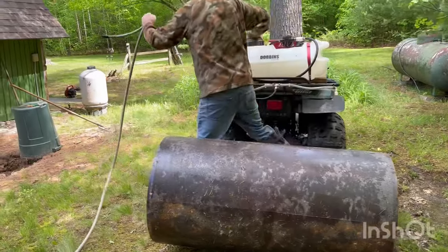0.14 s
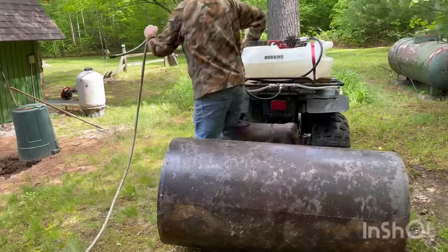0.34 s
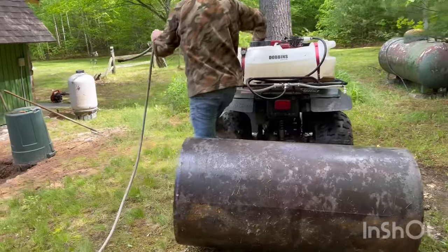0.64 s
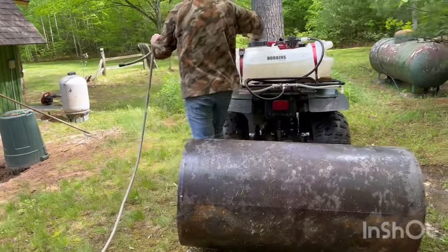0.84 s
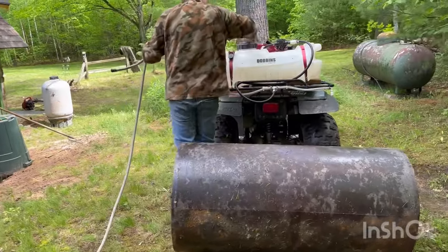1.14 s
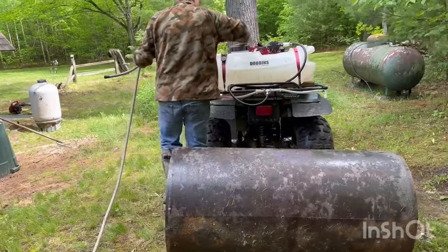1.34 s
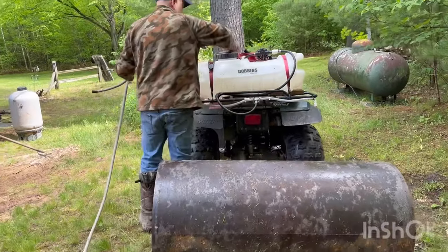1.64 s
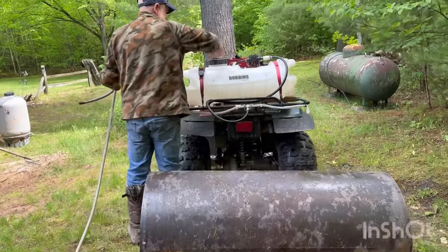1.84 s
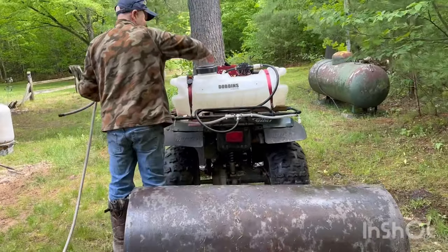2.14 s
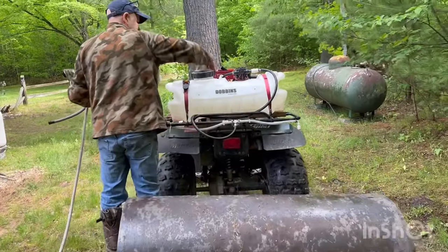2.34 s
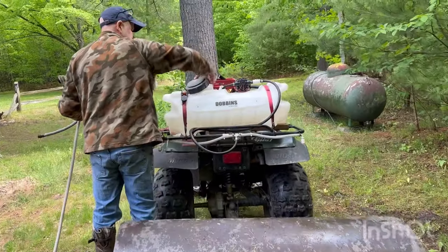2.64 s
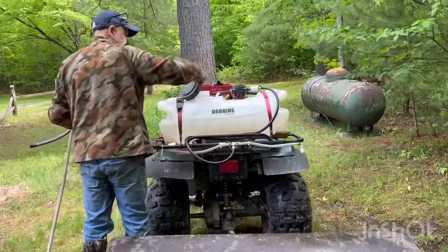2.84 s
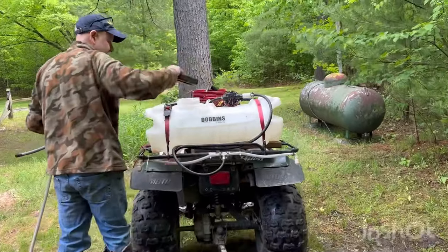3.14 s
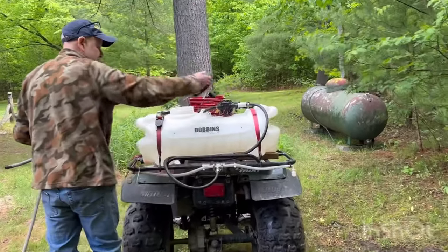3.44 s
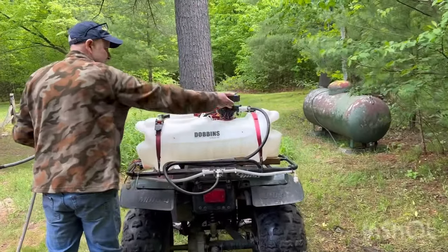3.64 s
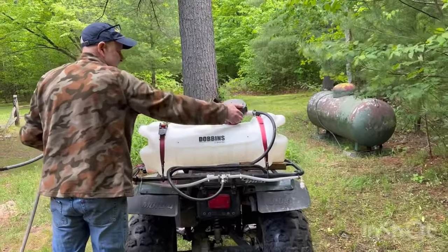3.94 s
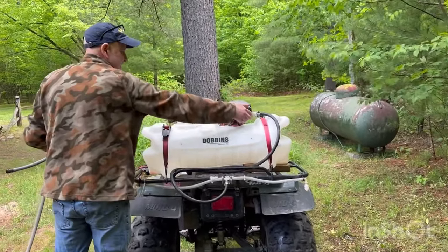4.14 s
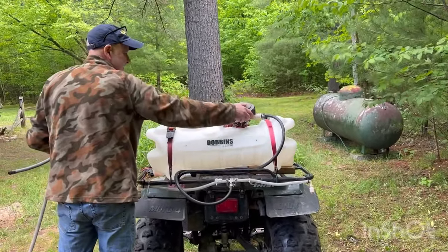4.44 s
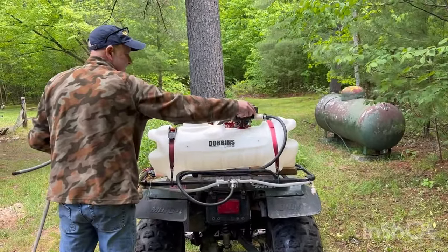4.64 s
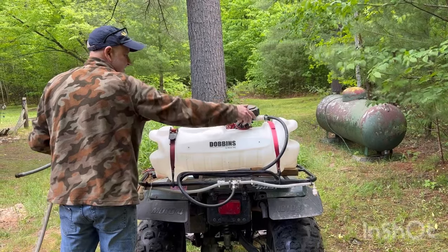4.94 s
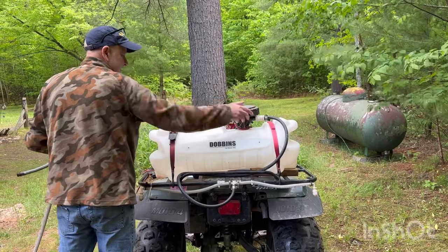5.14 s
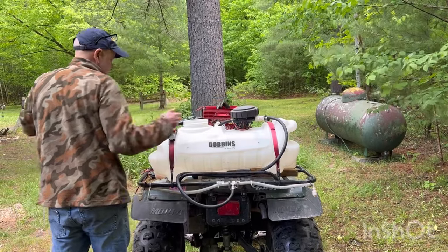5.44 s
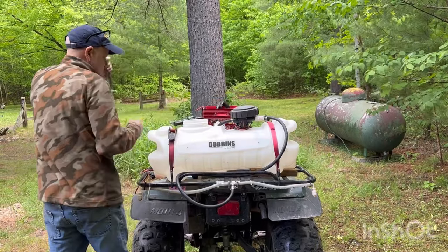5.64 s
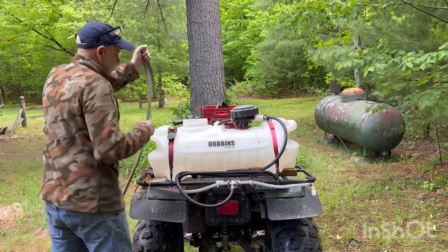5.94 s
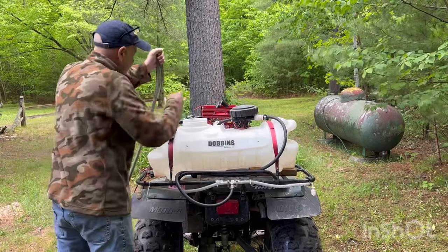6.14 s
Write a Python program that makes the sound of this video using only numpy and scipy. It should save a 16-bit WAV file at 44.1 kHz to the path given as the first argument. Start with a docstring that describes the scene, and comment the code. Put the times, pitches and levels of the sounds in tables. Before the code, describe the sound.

A quiet yard with a soft, wide hiss of leaves and faint low air rumble throughout. From 0.2 s a plastic screw lid is wrenched round on a large hollow tank: a dry, juddering scrape with a jolt and falling thump, then further short rasps near 0.6, 0.9, 1.2, 1.4 and 1.7 s, with knocks between. A stronger scrape comes at 2.0 s, another at 2.4 with a hard clunk at 2.45 and thin metallic chinks until 2.6. A last faint scrape falls around 2.8, while a distant bird gives a thin, quavering high whistle from 2.4 to 3.2. At 3.7 the lid clacks down and the tank air booms deeply. Light taps follow at 4.1 to 4.6, then a sharper clack and flexing thumps at 4.75. A jacket sleeve rustles faintly from 5.3 to 6.1. At 5.95 a hose end hits the tank, the loudest hollow knock, ringing briefly into the leaves.

```python
"""In a yard, the screw lid of a plastic sprayer tank is twisted off in jerky turns: stick-slip noise scrapes and judders.
Each turn has a jolt, mostly just after the scrape begins; jolts and knocks are damped wall modes and shaped noise.
The lid clacks down on the open tank, whose air booms at low modes; a metal part chinks; buckling walls thump.
A jacket sleeve rustles and a hose end knocks the tank with a short hollow note.
Leaves hiss all around as drifting stereo noise, and a far bird gives one thin, quavering whistle."""
import sys
import numpy as np
from scipy import signal
from scipy.fft import rfft, irfft, next_fast_len
from scipy.io import wavfile
from scipy.ndimage import map_coordinates

SR = 44100
rng = np.random.default_rng(int(sys.argv[2]) if len(sys.argv) > 2 else 0)


def master_out(mix):
    """Clip the mix to full scale and print it as 16-bit PCM to the path in sys.argv[1]."""
    frames = np.transpose(np.atleast_2d(mix))
    ceiling = np.clip(frames, -1, 1)
    pcm = np.round(ceiling * 32767).astype(np.int16)
    wavfile.write(sys.argv[1], SR, pcm)


N = 276948
TIME = np.arange(N) / SR  # s
AGE = np.arange(SR) / SR  # s since a hit

# wrist turns: (jolt time [s], push lead [s], push length after jolt [s], scrape level [dB],
#   hiss re scrape [dB], fizz re scrape [dB], jolt level [dB])
TURNS = [(0.213, 0.025, 0.28, -45, -5.5, -14.5, -30), (0.641, 0.011, 0.13, -44, -5.5, -11.5, -34),
         (0.922, 0.033, 0.042, -42.5, -10, -15.5, -35), (1.205, 0.026, 0.012, -43, -8.5, -15, -34),
         (1.434, 0.028, 0.037, -43.5, -10, -16.5, -33), (1.663, 0, 0.14, -49.5, -11.5, -14.5, -45),
         (1.999, 0.034, 0.26, -38.5, -12.5, -17, -37), (2.428, 0.027, 0.18, -42, -27, -21, -33),
         (2.873, 0.11, 0.034, -52, -12, -16, -36.5)]
# rumble spectrum of the tank wall: (frequency [Hz], density [dB])
WALL = [(25, -17), (50, -11.5), (82, 6.5), (150, -7.5), (280, -1.5), (450, -8.5), (700, -12.5),
        (1300, -50.5), (3000, -49.5)]
# rasp spectrum of neck and panels: (frequency [Hz], density [dB])
RASP = [(200, -16), (550, -7.5), (1050, 4.5), (1300, -1.5), (1600, 3), (2000, -13), (2400, -3.5),
        (3100, -16.5), (3800, -9.5), (6000, -43.5), (15000, -54)]
# hiss spectrum of dry plastic and swishing jacket: (frequency [Hz], density [dB])
HISS = [(800, -41), (2300, 10.5), (3100, 7), (3700, 11.5), (5300, 1), (8000, -23), (16000, -30)]
# crack spectrum of hard plastic: (frequency [Hz], density [dB])
CRACK = [(200, 7), (700, 7), (2000, 2.5), (3100, 0), (4000, 1.5), (5700, -10), (6700, -6), (9000, -13),
         (13000, -27), (16000, -39)]


def amp(db):
    """Decibels to gain."""
    return 10 ** (np.asarray(db) / 20)


def unit(x):
    """x at rms 1."""
    return x / np.sqrt(np.mean(x ** 2) + 1e-20)


def burst(x):
    """A hit with the energy of 20 ms at rms 1."""
    return x / np.sqrt(np.sum(x ** 2) / (SR * .02))


def along(points, hz):
    """Interpolate (frequency [Hz], value) points on a log frequency axis."""
    f, v = np.transpose(points)
    return np.interp(np.log(hz + 1), np.log(f + 1), v)


def curves(rows):
    """One value per sample for each column after the time."""
    s, *cols = np.transpose(rows)
    return [np.interp(TIME, s, c) for c in cols]


def wobble(rate_hz):
    """A smooth random curve, rate_hz knots a second."""
    knots = rng.standard_normal(int(N * rate_hz / SR) + 4)
    return map_coordinates(knots, [TIME * rate_hz])


def swells(rows):
    """Gain of smooth rises and falls, one per (middle [s], length [s], level [dB]) row."""
    return sum(amp(db) * np.cos(np.pi * np.clip((TIME - s) / length_s, -.5, .5))
               for s, length_s, db in rows)


def filtered(x, response):
    """x through a complex response of frequency."""
    size = x.shape[-1]
    m = next_fast_len(size + 8192)
    spectrum = rfft(x, m) * response(np.fft.rfftfreq(m, 1 / SR))
    return irfft(spectrum, m)[..., :size]


def coloured(x, spectrum, size=4096):
    """x through a causal minimum-phase filter, built by folding the cepstrum."""
    gain = amp(along(spectrum, np.fft.rfftfreq(size, 1 / SR)))
    cepstrum = irfft(np.log(gain))
    cepstrum[1:size // 2] *= 2
    cepstrum[size // 2 + 1:] = 0
    impulse = irfft(np.exp(rfft(cepstrum)))
    return signal.fftconvolve(x, impulse)[:len(x)]


def add(track, s, sound):
    """Mix a sound into the track at time s."""
    part = track[round(s * SR):][:len(sound)]
    part += sound[:len(part)]


def ring(modes, scatter_db, free=1):
    """Damped modes at random strengths and signs; free scales their ring times."""
    hz, db, t60_s = np.transpose(modes)[:, :, None]
    gain = amp(db + scatter_db * rng.standard_normal(hz.shape)) * rng.choice([-1, 1], hz.shape)
    decay = amp(-60 * AGE / (t60_s * free))
    return np.sum(gain * decay * np.sin(2 * np.pi * hz * AGE), axis=0)


def clatter(spectrum, t60_s):
    """Decaying coloured noise: countless close modes that die together."""
    noise = rng.standard_normal(SR) * amp(-60 * AGE / t60_s)
    return burst(coloured(noise, spectrum))


def slips(rate_hz, spread_db):
    """Tiny stick-slip jerks of uneven size at random moments, rate_hz a second on average."""
    size = amp(spread_db * np.minimum(rng.exponential(size=N), 3))
    return (rng.random(N) < rate_hz / SR) * size * rng.choice([-1, 1], N)


def push(start_s, end_s, rise_s, release_db_per_s):
    """Gain of one push of the wrist: it builds up, sags as the push tires, and is let go."""
    sag_db_per_s = 29.5
    age = np.maximum(TIME - start_s, 0)
    let_go = np.maximum(TIME - end_s, 0)
    build_up = 1 - np.exp(-(age / rise_s) ** 2)
    return build_up * amp(-sag_db_per_s * age - release_db_per_s * let_go)


def threads():
    """The lid judders in its threads: slips shake the wall and rasp in the neck, and the dry plastic hisses."""
    # fizz spectrum: (frequency [Hz], density [dB])
    fizz_spectrum = [(2500, -25.5), (5500, 14), (7500, 10), (13000, 2), (16000, 0)]
    grip_s, fizz_rise_s, release_db_per_s = 0.022, 0.017, 129
    wall_linger = 0.83  # the wall's rumble falls at this share of the release rate
    wall_db, rasp_db = 4, -4.5  # re scrape level
    wall_gain, rasp_gain, hiss_gain, fizz_gain = np.zeros((4, N))
    for s, lead_s, length_s, db, hiss_db, fizz_db, _ in TURNS:
        span = s - lead_s, s + length_s
        stroke = push(*span, grip_s, release_db_per_s)
        wall_gain += amp(db + wall_db) * push(*span, grip_s, wall_linger * release_db_per_s)
        rasp_gain += amp(db + rasp_db) * stroke
        hiss_gain += amp(db + hiss_db) * stroke
        fizz_gain += amp(db + fizz_db) * push(*span, fizz_rise_s, release_db_per_s)
    jerks = unit(slips(rate_hz=1100, spread_db=4))
    grit = unit(slips(rate_hz=6000, spread_db=3)) + .7 * jerks
    snags = amp(-9) * unit(slips(rate_hz=45, spread_db=1))  # sparse crackle
    rumble = wall_gain * unit(coloured(jerks, WALL))
    rasp = rasp_gain * unit(coloured(jerks + snags, RASP))
    hiss = hiss_gain * unit(coloured(grit + snags, HISS))
    fizz = fizz_gain * unit(coloured(grit, fizz_spectrum))
    grip = amp(1.8 * wobble(80) - .4)  # the dry thread catches and lets go
    return rumble + grip * (rasp + hiss + fizz)


def blow(hard_db, free):
    """A blow cracks on the plastic, raps its panels and thuds through the tank; a harder one is brighter."""
    # whole-tank modes: (frequency [Hz], level [dB], t60 [s])
    tank_modes = [(107.2, -19, 1), (151.5, -19, 0.43), (193, -1, 0.19), (224.4, -3, 0.43), (265.8, -6, 0.2),
                  (278.3, 0, 0.13), (320, -7.5, 0.21), (381, -6.5, 0.086), (439.6, -9, 0.62)]
    # wall-panel modes: (frequency [Hz], level [dB], t60 [s])
    panel_modes = [(526.6, -7, 0.37), (597, -2.5, 0.25), (724, -16, 0.15), (730, -12, 0.14), (840, -3, 0.2),
                   (958, -2.5, 0.22), (1048, -6.5, 0.36), (1170, -18, 0.082), (1552, 7, 0.06),
                   (1670, 14, 0.035), (2337, 16, 0.032)]
    contact_hz, contact_oct_per_db = 514, 0.24  # a harder contact reaches higher modes
    crack_db, crack_db_per_hard_db = -13, 1.28
    thud = amp(-2.0) * burst(ring(tank_modes, 1.0, free)) + amp(-5.5) * clatter(WALL, t60_s=0.18)
    panels = amp(-0.5) * burst(ring(panel_modes, 3, free)) + amp(-0.5) * clatter(RASP, t60_s=0.11)
    bright_hz = contact_hz * 2 ** (contact_oct_per_db * hard_db)
    contact = signal.butter(2, min(bright_hz, SR / 4), fs=SR)
    onset = 1 - np.exp(-AGE / 0.00029)
    rap = amp(-7.5) * burst(signal.lfilter(*contact, panels * onset))
    crack = amp(-8.0) * clatter(CRACK, t60_s=0.017) + amp(-12) * clatter(CRACK, t60_s=0.17)
    return thud + amp(hard_db) * rap + amp(crack_db + crack_db_per_hard_db * hard_db) * crack


def knocks():
    """Each turn has a jolt, and hand, lid and hose bump the tank; a hand on it shortens the ring."""
    # blows of hand, lid and hose: (time [s], level [dB], hardness [dB], share of free ring time [1])
    bumps = [(0.381, -40, 1.5, 1), (0.613, -35.5, -12, 0.71), (0.769, -41.5, 1.5, 0.62),
             (0.944, -35.5, 2, 0.55), (1.166, -45, -3.5, .5), (1.331, -44, -9, 0.22),
             (1.941, -40.5, -1.5, 0.39), (2.147, -34, 6, 0.54), (2.334, -36.5, -3.5, .7),
             (2.452, -25.5, -4, 0.49), (2.502, -30.5, 5.5, 0.78), (2.591, -37, 2, 1),
             (2.897, -48.5, 1.5, .35), (3.713, -35, 0, .6), (3.873, -38.5, -10, 0.34),
             (3.892, -37, -2.5, 0.74), (4.132, -49, -11, 1), (4.544, -41.5, 0.5, 1), (4.628, -46, -16, 1),
             (4.773, -41, -5.5, 0.54), (4.862, -47, -4.5, 0.87), (5.953, -21.5, -1, 1)]
    jolt_hard_db, held_ring = -1, 0.55
    jolts = [(s, db, jolt_hard_db, held_ring) for s, *_, db in TURNS]
    out = np.zeros(N)
    for s, db, hard_db, free in jolts + bumps:
        add(out, s, amp(db) * blow(hard_db, free))
    return out


def flexes():
    """The wall buckles; its high bending waves arrive first, so the thump falls in pitch."""
    # buckles: (time [s], level [dB], first frequency [Hz], limit frequency [Hz], time scale [s])
    buckles = [(0.212, -24, 387, 116, 0.0464), (2.335, -40, 227, 65, 0.037),
               (2.604, -30.5, 126.4, 59, 0.074), (4.218, -32, 205, 191, 0.027),
               (4.737, -26.5, 280, 244, 0.024), (4.779, -28, 185, 160, 0.019)]
    out = np.zeros(N)
    for s, db, first_hz, last_hz, length_s in buckles:
        u = AGE / length_s
        hz = last_hz + (first_hz - last_hz) * np.exp(-1.6 * u)
        swell = (1 - np.exp(-u / 0.037)) * np.exp(-1.2 * u ** 2 - 0.51 * u)
        add(out, s, amp(db - 2.0) * swell * np.sin(2 * np.pi * np.cumsum(hz) / SR))
    return out


def lid():
    """The hard plastic lid clicks on its edge and clacks briefly."""
    # contacts: (time [s], clack level [dB], edge click gain re clack [dB])
    contacts = [(3.711, -33, 5), (3.739, -39, -28), (3.809, -50, -8), (3.868, -44, -23), (4.128, -52, -12),
                (4.19, -42, -22), (4.526, -46.5, -11), (4.542, -46.5, -5.5), (4.626, -40.5, -24),
                (4.724, -27, -23.5), (4.734, -32, -19), (4.772, -46, -13)]
    # lid modes: (frequency [Hz], level [dB], t60 [s])
    cap_modes = [(1000, 2.5, 0.072), (1097, 5.5, 0.047), (1320, -0.5, 0.033), (1430, -12, 0.036),
                 (1690, -11, 0.025), (1920, -8, 0.036), (2380, -20, 0.024), (2670, -8, 0.044),
                 (4010, -17, .025), (5080, -9, 0.027)]
    out = np.zeros(N)
    snap = burst(coloured(signal.unit_impulse(SR), CRACK))
    for s, db, edge_db in contacts:
        edge = amp(-7.0) * snap
        edge = edge + amp(-9) * clatter(CRACK, t60_s=0.012) + amp(-8.5) * clatter(CRACK, t60_s=0.03)
        clack = amp(-9) * burst(ring(cap_modes, scatter_db=2.0)) + amp(-17.5) * clatter(RASP, t60_s=0.075)
        add(out, s, amp(db) * (clack + amp(edge_db) * edge))
    return out


def booms(rise_s=0.014):
    """The air in the tank bounces in the open filler neck: low damped modes that build up softly."""
    # booms: (time [s], level [dB])
    hits = [(2.51, -33), (2.88, -37.5), (3.722, -23), (4.191, -43.5), (4.556, -32.5), (4.738, -41),
            (5.961, -35)]
    # air modes: (frequency [Hz], level [dB], t60 [s])
    air_modes = [(65.6, -0.5, 0.85), (116.5, -15, 0.78), (133.3, -12.5, 0.42), (222, -17, 0.74)]
    note = sum(amp(db - 60 * AGE / t60_s) * np.sin(2 * np.pi * hz * AGE) for hz, db, t60_s in air_modes)
    note = note * (1 - np.exp(-AGE / rise_s))
    out = np.zeros(N)
    for s, db in hits:
        add(out, s, amp(db) * note)
    return out


def hose_end():
    """The stubby hose end gives a short hollow note of its own as it lands."""
    # hose-end modes: (frequency [Hz], level [dB], t60 [s])
    nozzle_modes = [(342, -11.5, 0.17), (524, -15, 0.25), (610, 0, 0.043), (690, -12.5, 0.23),
                    (780, -3.5, 0.025)]
    out = np.zeros(N)
    add(out, 5.953, amp(-27.5) * burst(ring(nozzle_modes, scatter_db=1)))
    return out


def chinks():
    """Some small metal part is jolted and rings thinly in high damped modes."""
    # chinks: (time [s], level [dB])
    jingles = [(2.430, -42.5), (2.453, -47), (2.505, -50.5), (2.608, -48.5), (2.620, -48)]
    # metal modes: (frequency [Hz], level [dB], t60 [s])
    metal_modes = [(11997, -10.5, 0.087), (13068, -5.5, 0.053), (13482, -14, 0.097)]
    out = np.zeros(N)
    for s, db in jingles:
        add(out, s, amp(db + 3) * ring(metal_modes, scatter_db=2))
    return out


def sleeve():
    """The jacket swishes as the arm reaches out, and cloth brushes on cloth: dense slips of fibres."""
    # sleeve strokes: (middle [s], length [s], level [dB])
    strokes = [(5.41, 0.35, -65.5), (5.64, 0.32, -67), (5.93, 0.42, -65)]
    # jacket swishes: (middle [s], length [s], level [dB])
    swishes = [(2.985, 0.08, -59), (3.61, 0.08, -59.5)]
    # cloth spectrum: (frequency [Hz], density [dB])
    cloth_spectrum = [(2500, -24), (5500, -6), (7800, -4), (13000, -3.5), (16000, -22)]
    fibres = slips(rate_hz=4000, spread_db=-1.0)
    brush = swells(strokes) * unit(coloured(fibres, cloth_spectrum))
    swish = swells(swishes) * unit(coloured(fibres, HISS))
    return amp(0.76 * wobble(25)) * (brush + swish)


def at_ports(x):
    """Two microphone ports hear the tank with slightly different phase and level."""
    # phase between ports: (frequency [Hz], left lead [rad])
    lead_points = [(100, 0.008), (500, -0.15), (1800, -0.72), (2500, 0.79), (5700, 0.95), (8000, 0.16),
                   (9000, -2.3), (12000, -1.46)]
    # level between ports: (frequency [Hz], left re right [dB])
    lean_points = [(60, -0.5), (150, -1), (380, 0), (950, -2.5), (2380, -2.5), (5980, 1.5), (15000, -0.5)]
    half = lambda hz: np.exp(.5j * along(lead_points, hz)) * amp(along(lean_points, hz) / 2)
    return filtered(x, lambda hz: np.array([half(hz), 1 / half(hz)]))


def echoes(x, t60_s):
    """Scattered returns from trees and ground: decaying noise, different for each ear."""
    tail = rng.standard_normal((2, SR)) * amp(-60 * AGE / t60_s) * (1 - np.exp(-AGE / 0.0018))
    return signal.fftconvolve(x[None], tail / np.linalg.norm(tail[0]), axes=1)[:, :N]


def bird():
    """A thin, quavering, slowly climbing whistle with a husky lower edge, smeared by the trees."""
    # whistle swells: (middle [s], length [s], level [dB])
    whistles = [(2.56, 0.43, -66), (2.79, 0.18, -60), (3.02, 0.45, -62.5)]
    start_hz, rise_hz_per_s = 7200, 55  # start_hz: at the middle of the first swell
    hz = start_hz + rise_hz_per_s * (TIME - whistles[0][0])
    tone = np.sin(2 * np.pi * np.cumsum(hz + 70 * wobble(140)) / SR)
    husk = amp(-3) * np.sin(2 * np.pi * np.cumsum(hz - 550 + 380 * wobble(800)) / SR)
    call = swells(whistles) * (tone + husk)
    return call + amp(-4) * echoes(call, t60_s=.25)


def leaves():
    """Light air in the trees: a soft, uneven rumble under a hiss that drifts with the breeze."""
    # air and leaf spectrum: (frequency [Hz], density [dB])
    leaf_spectrum = [(15, -30), (25, -19), (54, -3), (128, -4.5), (150, -9.5), (438, -16.5), (501, -17),
                     (543, -18), (691, -17.5), (879, -17.5), (2000, -26), (3000, -25), (4700, -28),
                     (5600, -33.5), (7680, -35), (9770, -42.5), (11500, -45), (15000, -46.5)]
    # stereo likeness: (frequency [Hz], left-right correlation [1])
    likeness = [(60, 0.92), (180, 0.85), (550, 0.43), (1650, -0.12), (4970, 0.65), (11600, -0.33)]
    # breeze, used re its mean: (time [s], hiss level [dB])
    breeze_points = [(0.0, -67), (0.42, -66.5), (1.78, -66.5), (2.19, -66.5), (3.08, -65.5), (6.28, -65)]
    # mid/side mixing angle that yields the correlation
    turn = lambda hz: np.arccos(np.clip(along(likeness, hz), -1, 1)) / 2
    shape = lambda hz: amp(along(leaf_spectrum, hz)) * np.array([np.cos(turn(hz)), np.sin(turn(hz))])
    mid, side = filtered(rng.standard_normal((2, N)), shape)
    air = amp(-54) * unit(np.array([mid + side, mid - side]))
    rumble = filtered(air, lambda hz: 1 / (1 + (hz / 300) ** 2))
    breeze_db, = curves(breeze_points)
    drift_db = breeze_db - breeze_db.mean() + 0.5 * wobble(3.09) + 0.5 * wobble(23)
    return rumble * amp(3.5 * wobble(13)) + (air - rumble) * amp(drift_db)


def scene():
    """The tank straight ahead, trees and leaves all around."""
    tank = threads() + knocks() + flexes() + lid() + hose_end() + chinks()
    treble = filtered(tank, lambda hz: hz / (hz + 400))  # trunks and leaves scatter little bass
    near = at_ports(tank + booms() + sleeve())
    return near + amp(-9.5) * echoes(treble, t60_s=0.24) + bird() + leaves()


def record(dry):
    """The sound loses its deepest bass, has a dip near 10 kHz and ends steeply above about 14.7 kHz."""
    bass = lambda hz: hz ** 2 / np.sqrt(hz ** 4 + 35 ** 4)
    dip = lambda hz: amp(-24 * np.exp(-((hz - 10050) / 900) ** 4))
    edge = lambda hz: (hz < 15800) / (1 + (hz / 14700) ** 50)
    return filtered(dry, lambda hz: bass(hz) * dip(hz) * edge(hz))


dry = scene()
out = record(dry)
master_out(out)
```